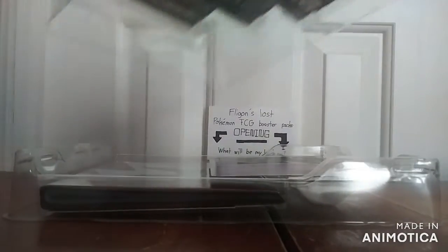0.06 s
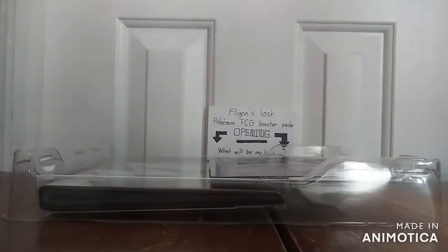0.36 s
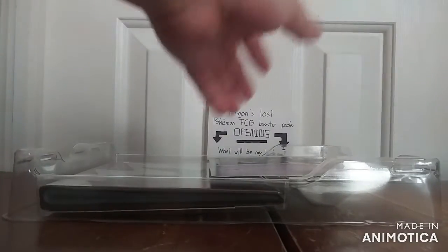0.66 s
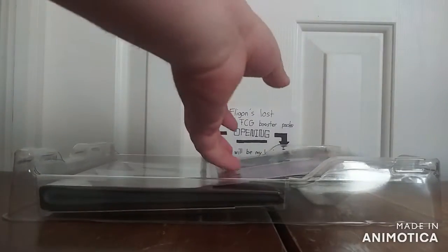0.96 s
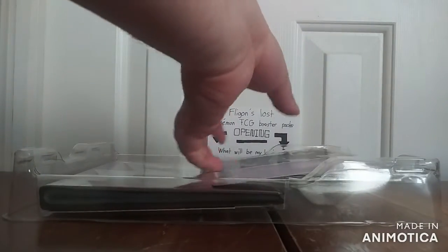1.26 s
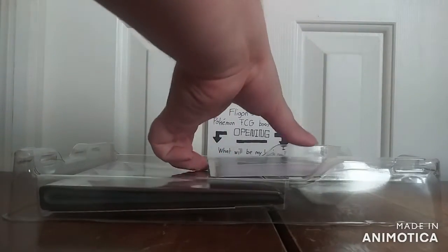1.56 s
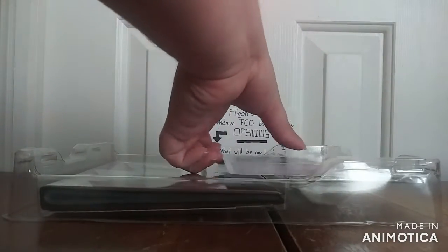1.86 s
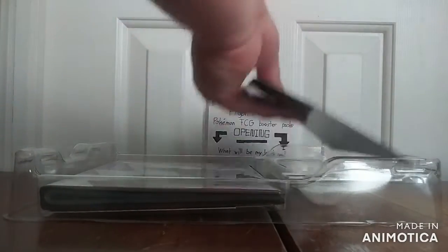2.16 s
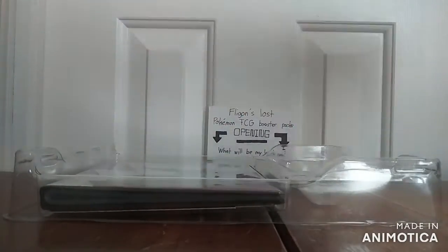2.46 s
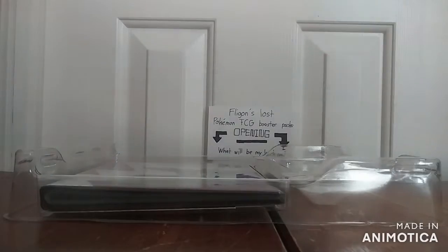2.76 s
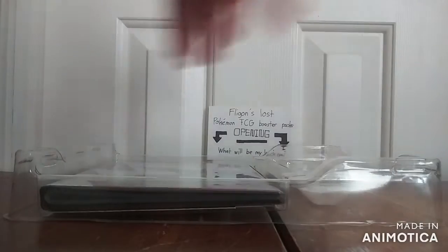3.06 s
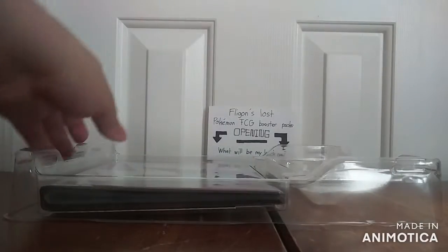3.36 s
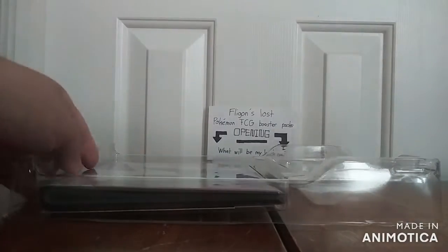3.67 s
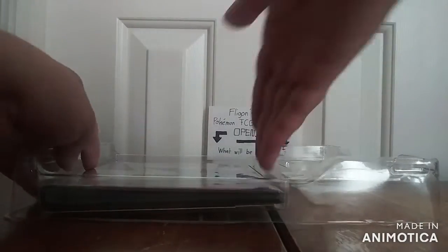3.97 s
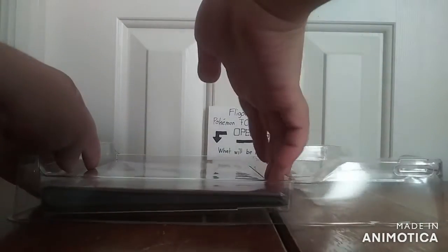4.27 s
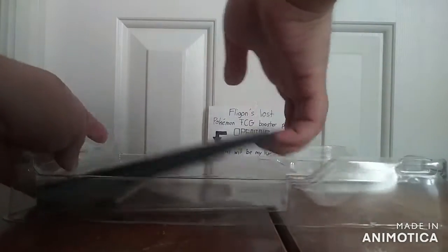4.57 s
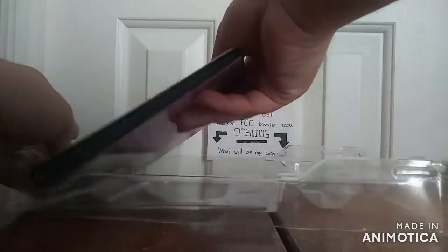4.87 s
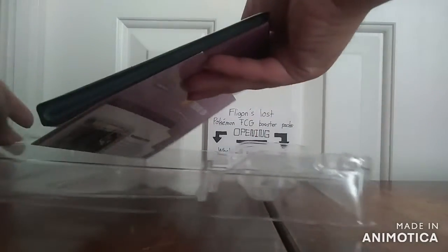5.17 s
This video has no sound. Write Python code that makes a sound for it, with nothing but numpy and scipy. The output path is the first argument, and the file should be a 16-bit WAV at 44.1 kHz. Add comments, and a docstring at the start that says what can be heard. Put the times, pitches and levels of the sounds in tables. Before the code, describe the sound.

A hard case clacks, then thin plastic packaging crackles and pops under rubbing fingers, close by in a small room.

```python
"""At a wooden table in a small room, hands work items out of a clear plastic tray near the microphone.
A hard case clacks first. The tray's thin sheet snaps and buckles, loudest as a card pops free.
Fingers and card stick and slip on the plastic, so it crinkles, ticks and rings; fingertips swish and
squeak along the rim. A few soft bumps reach the table, and near the end a card holder scrapes as it
is lifted out. Under it all lie a faint hiss and, later, a low hum."""
import sys
import numpy as np
from scipy import signal
from scipy.io import wavfile
from scipy.ndimage import uniform_filter1d

SR = 44100
rng = np.random.default_rng(int(sys.argv[2]) if len(sys.argv) > 2 else 0)


def materialize(psi):
    """Save the field psi as 16-bit PCM at rate SR to the path in sys.argv[1].

    A 1-D psi becomes a single channel; in a 2-D psi each row is a channel.
    """
    bounded = np.clip(np.atleast_2d(psi).T, -1, 1)
    quanta = np.round(bounded * 32767).astype(np.int16)
    wavfile.write(sys.argv[1], SR, quanta)


N = 238801

# A ring time (t60) is the seconds a sound takes to fade by 60 dB. Levels in the tables are relative.
# The notes of the hard case. Each row: pitch in Hz, level in dB, ring time in seconds.
CASE_NOTES = [(236, -23, 0.061), (738, -16, 0.025), (850, -23, .04), (1107, -2, 0.045), (1510, -23, 0.017),
              (2060, -22.5, .025), (3390, -19.5, 0.014), (4385, -5, 0.004), (8400, -29, 0.024)]
# The background hiss, which dips in the pause. Each row: time in seconds, level in dB.
HISS_LEVELS = [(0.9, -60.5), (2.4, -65), (2.72, -71), (3.1, -68), (3.5, -59.5), (5.4, -66)]
# Short scuffs of card and fingertips. Each row: middle in seconds, half width in seconds,
# drag level in dB, hiss level in dB, pitch of the rubbed panel in Hz.
SCUFF_EVENTS = [ (0.036, 0.01, -39, -47, 820), (0.187, 0.017, -49, -55, 860),
                (0.202, 0.0063, -40, -39, 1010), (0.558, 0.0041, -47, -50, 1100),
                (0.638, 0.0052, -48, -59, 1160), (1.26, 0.037, -44.5, -49, 800),
                (1.468, 0.019, -44, -48, 645), (1.875, 0.064, -45, -56.5, 725),
                (1.972, 0.023, -43.5, -50.5, 714), (2.125, 0.011, -41.5, -51, 1730),
                (2.363, 0.02, -41, -56.5, 617), (2.998, 0.013, -51.5, -42, 1030),
                (3.485, 0.011, -71, -43.5, 915), (3.83, 0.017, -52.5, -65, 760),
                (4.345, 0.027, -40.5, -53.5, 1063), (4.53, 0.025, -49.5, -70, 800),
                (4.678, 0.02, -51.5, -47.5, 817), (4.752, .024, -42.5, -47, 1115),
                (4.887, 0.028, -48, -44.5, 800), (4.978, 0.015, -54, -48.5, 1150),
                (5.185, 0.012, -54.5, -51.5, 1894), (5.285, 0.0099, -51, -49, 1417)]
# The notes of the tray's flat panels. Each row: pitch in Hz, level in dB, ring time in seconds.
TRAY_NOTES = [(291.6, -6, 0.086), (498, 3, 0.48), (654, 0.5, 0.32), (718, -2.5, 0.13), (785, -30.5, 0.081),
              (899, 0.5, 0.15), (1140, -0.5, 0.056), (1236, -7.5, 0.33), (1370, -5.5, 0.11),
              (1625, -5, 0.38), (1693, 2.5, .18), (1830, -16, 0.041), (2220, -29.5, 0.14), (3900, -5, .2),
              (4660, -16.5, 0.12), (6530, -21, .12), (7350, -10.5, 0.077), (7480, -15, 0.1),
              (7470, 0.5, 0.047)]
# Snaps of the sheet. Each row: start in seconds, level in dB, panel pitch in Hz, sharpness in dB,
# panel ring time in seconds.
SNAP_EVENTS = [ (0.104, -39.5, 1330, -30, 0.031), (0.222, -35, 1500, -12.5, 0.12),
               (0.239, -30, 1410, -5, 0.033), (0.283, -27.5, 1910, -14.5, 0.033),
               (0.632, -41, 1240, 0, 0.088), (0.905, -51, 1060, -3, .03),
               (0.998, -34.5, 1760, -17.5, 0.062), (1.111, -30, 700, -17.5, 0.031),
               (1.156, -29, 994, -8, 0.1), (1.171, -32.5, 668, -18, 0.092),
               (1.193, -31.5, 1020, -3.5, .085), (1.215, -28.5, 810, -2, 0.093),
               (1.311, -36.5, 1153, -15, 0.068), (1.425, -42, 1718, -5.5, 0.076),
               (1.678, -40.5, 660, -30, 0.051), (1.759, -33.5, 1170, -21, 0.058),
               (1.826, -36.5, 740, -41, 0.029), (1.917, -20, 1077, -9.5, 0.064),
               (1.927, -23.5, 980, -16, 0.13), (1.948, -23, 696, -6, 0.059), (2.229, -12, 1742, -17, 0.039),
               (2.238, -12.5, 1064, -15, 0.033), (2.25, -24, 511, -17, 0.1), (2.314, -29, 863, -21, 0.05),
               (2.326, -28.5, 887, 0.5, 0.068), (2.333, -27, 663, -4, .085),
               (2.935, -41.5, 1083, -5.5, 0.065), (2.952, -40.5, 833, -17, 0.06),
               (3.285, -31.5, 1260, 1, 0.079), (3.292, -26.5, 880, -0.5, 0.02), (3.3, -33, 800, -5, 0.035),
               (3.354, -37, 1530, -0.5, 0.044), (3.415, -46, 1490, 5, 0.029),
               (3.456, -30.5, 996, -16.5, .055), (4.193, -26.5, 1530, -12, 0.023),
               (4.201, -21.5, 860, -16, 0.02), (4.436, -38, 817, -30, 0.047),
               (4.575, -36.5, 736, 1.5, 0.024), (4.823, -30.5, 765, -8, 0.042),
               (5.055, -32.5, 748, -12, 0.036), (5.279, -42.5, 800, 3.5, 0.027)]
# Hands rubbing. Each row: start in seconds, seconds until it fades, drag level in dB, hiss level in dB.
RUB_EVENTS = [ (0.375, .34, -61.5, -52), (0.987, 0.052, -54, -56), (1.146, 0.18, -46, -49),
              (1.334, 0.24, -53, -54.5), (1.74, .47, -54.5, -60), (2.228, 0.034, -39, -41.5),
              (2.355, 0.11, -64, -60), (2.864, 0.12, -67, -60), (3.3, .06, -74, -62), (3.47, .32, -59, -70),
              (3.978, 0.16, -55, -57.5), (4.165, 0.23, -51.5, -60), (4.468, .22, -52, -56),
              (4.732, .26, -49.5, -52), (5.034, 0.3, -68, -47.5)]
# Fingertips on the rim. Each row: start in seconds, seconds until it fades, swish in dB, squeak in dB.
GLIDE_EVENTS = [(2.522, 0.057, -65, -86), (3.116, 0.044, -57, -85), (3.196, 0.041, -49.5, -72),
                (3.496, 0.15, -53, -56.5), (3.667, 0.12, -54.5, -65), (3.951, 0.2, -73, -62.5)]
# Soft bumps on the table. Each row: start in seconds, level in dB, pitch in Hz.
BUMP_EVENTS = [(2.948, -33.5, 334), (2.962, -38, 171.5), (2.982, -42, 172), (3.397, -49.5, 141),
               (3.436, -42, 114), (3.47, -39.5, 145)]
# Where scraped parts ring. Each row: pitch in Hz, base width in Hz, level in dB.
RIM_RESONANCES = [(2320, 150, -10), (4160, 380, 4), (4800, 330, 0), (5900, 370, -2)]
HOLDER_RESONANCES = [(748, 140, 0.5), (1134, 40, 1), (1407, 170, 2.5), (1900, 220, 2.5), (2170, 110, -5),
                     (2600, 200, -3)]
# Echoes off the table and the door. Each row: delay in seconds, gain (minus flips the wave).
NEAR_ECHOES = [(.0027, 0.002), (.0046, -0.0045), (.0083, 0.031), (0.0109, -0.042)]
# How long the room rings. Each row: frequency in Hz, ring time in seconds.
ROOM_RING_TIMES = [(150, 0.32), (500, 0.22), (1500, 0.21), (4000, 0.19), (7500, 0.21), (12000, 0.22)]

# The tone of each noise, from bass to treble. Each row: frequency in Hz, level in dB.
CLATTER_TONE = [(150, -24.5), (400, -15.5), (600, -11), (850, 0.5), (1200, -0.5), (1600, -3), (2100, -6.5),
                (2700, -17.5), (3600, -16), (9000, -47.5)]  # loose things in the case
CRACK_TONE = [(900, -42.5), (2200, -4.5), (3400, 5.5), (4800, 6), (5700, -1.5), (6800, 6), (7900, 6),
              (8800, -5), (10200, -6), (12000, -23.5), (15800, -25)]  # plastic cracking sharply
HISS_TONE = [(25, -39.5), (70, -14.5), (150, -12), (260, -2.5), (600, -12.5), (1200, -12), (1900, -18),
             (4000, -16.5), (6000, -19), (7800, -17), (10000, -27), (15800, -34.5)]  # moving arms, clothes and the room
DRAG_TONE = [(40, -41), (110, -16), (220, -1.5), (430, 0.5), (750, 6), (1100, 3.5), (1450, 1), (1900, -3.5),
             (2700, -5), (4500, -9.5), (9000, -51)]  # panels shaken by dragging
SKIN_TONE = [(700, -22.5), (2200, -0.5), (3300, -0.5), (4300, 2.5), (5600, 2.5), (6700, 4), (7700, 5),
             (8700, -2), (10000, -9), (12000, -14), (15800, -19)]  # skin hissing on plastic
PANEL_TONE = [(150, -45), (350, -17), (520, 1.5), (1100, 1), (1900, -2), (2700, -7), (4200, -20),
              (9000, -59)]  # a panel flipping
THUD_TONE = [(25, -50), (60, -29.5), (100, -15.5), (150, -7.5), (260, 1), (480, -4.5), (750, -21.5),
             (2000, -38.5)]  # a dull knock on tray or table
SWISH_TONE = [(1500, -14), (2800, -16), (4100, -8), (5400, -13.5), (6500, -8), (7600, -0.5), (9000, -10),
              (10500, -15.5), (13000, -17.5), (15800, -20)]  # a lightly gliding fingertip


def amp(db):
    """Turns decibels into a gain to multiply by."""
    return 10 ** (np.asarray(db) / 20)


def unit(x):
    """Scales a sound to an average (rms) level of 1."""
    return x / np.sqrt(np.mean(x ** 2) + 1e-20)


def look_up(table, hz):
    """Reads between a table's rows on a logarithmic frequency scale."""
    row_hz, value = np.transpose(table)
    return np.interp(np.log(hz + 1), np.log(row_hz + 1), value)


def add(mix, start, sound):
    """Mixes a sound in at a start time in seconds."""
    part = mix[max(round(start * SR), 0):][:len(sound)]
    part += sound[:len(part)]


def colour(x, tone, size=4096):
    """Gives a sound the tone in a table, with a filter that rings only after each hit."""
    log_gain = np.log(amp(look_up(tone, abs(np.fft.fftfreq(size, 1 / SR)))))
    response = np.exp(np.conj(signal.hilbert(log_gain)))
    taps = np.fft.ifft(response).real[:size // 2]
    return signal.oaconvolve(x, taps / np.linalg.norm(taps))[:len(x)]


def resonate(x, hz, width):
    """Keeps a band around one pitch and brings it to level 1."""
    return unit(signal.lfilter(*signal.iirpeak(hz, hz / width, fs=SR), x))


def fade(t, t60):
    """A gain that falls 60 dB in t60 seconds."""
    return np.exp(-np.log(1000) * t / np.maximum(t60, 1e-3))


def swell(start, rise_s):
    """A gain that climbs from 0 to 1 and stays there."""
    return np.clip((np.arange(N) / SR - start) / rise_s, 0, 1)


def stroke(start, length, rise_s, t60):
    """The gain of one hand movement: it climbs, holds, then fades."""
    since_end = np.maximum(np.arange(N) / SR - start - length, 0)
    return swell(start, rise_s) * fade(since_end, t60)


def burst(t, t60, tone, grit):
    """A fading cluster of tiny kicks; more grit makes their sizes more uneven."""
    kicks = rng.standard_normal(len(t)) * np.exp(grit * rng.standard_normal(len(t)))
    sound = colour(kicks * fade(t, t60), tone)
    return sound / np.linalg.norm(sound) * np.sqrt(SR / 200)  # the energy of 5 ms at level 1


def slips(per_s, spread_db, smooth):
    """Surfaces stick and slip: tiny random kicks over smooth sliding noise."""
    sizes = amp(spread_db * np.minimum(rng.exponential(1, N), 4))
    kicks = sizes * rng.choice([-1, 1], N) * (rng.random(N) < per_s / SR)
    return unit(unit(kicks) + smooth * rng.standard_normal(N))


def catching(depth_db, catch_s):
    """A gain that wanders as a grip catches and lets go."""
    wander = unit(uniform_filter1d(rng.standard_normal(N), int(catch_s * SR)))
    return unit(amp(depth_db * wander))


def scrape(resonances, per_s, smooth, widen=1.1):
    """An edge or fingertip judders over plastic and sets it ringing."""
    judder = slips(per_s, spread_db=3, smooth=smooth)
    ring = np.zeros(N)
    for hz, width, db in resonances:
        band = resonate(judder, hz, width * widen)
        ring += amp(db) * resonate(band, hz, width * widen)  # a second pass gives steeper sides
    return unit(ring)


def case_clack(start=0.0002, low_cut_hz=190):
    """A stiff case is knocked close by: it rings briefly and its loose contents clatter."""
    t = np.arange(SR // 5) / SR
    ring = sum(amp(db) * fade(t, t60) * np.sin(2 * np.pi * hz * t) for hz, db, t60 in CASE_NOTES)
    clatter = amp(-20) * burst(t, t60=0.067, tone=CLATTER_TONE, grit=0.36)
    rattle = amp(-25) * burst(t, t60=0.044, tone=CRACK_TONE, grit=1)
    out = np.zeros(N)
    add(out, start, amp(-12) * ring + clatter + rattle)
    return signal.sosfilt(signal.butter(4, low_cut_hz, "high", fs=SR, output="sos"), out)


def hiss():
    """A soft background hiss of moving arms, clothes and room, dipping in the pause."""
    level_db = np.interp(np.arange(N) / SR, *np.transpose(HISS_LEVELS))
    return amp(level_db) * colour(rng.standard_normal(N), HISS_TONE)


def scuffs():
    """Short strokes swell and fade, each drawing a hollow note from the panel under it."""
    t, out = np.arange(N) / SR, np.zeros(N)
    crinkle = slips(per_s=1200, spread_db=1, smooth=0.46)
    drag = colour(crinkle, DRAG_TONE)
    fizz = colour(slips(per_s=2700, spread_db=5, smooth=0.67), SKIN_TONE)
    for middle, half_width, drag_db, hiss_db, hz in SCUFF_EVENTS:
        near = abs(t - middle) < 3 * half_width
        hollow = resonate(crinkle[near], hz, width=hz / 9)
        body = amp(-5) * unit(drag[near]) + amp(-4) * hollow
        touch = np.exp(-((t[near] - middle) / half_width) ** 2)
        out[near] += touch * (amp(drag_db) * body + amp(hiss_db - 1) * fizz[near])
    return out


def tray(x):
    """Whatever touches the tray sets its panels ringing."""
    t = np.arange(SR // 2) / SR
    ring = np.zeros(len(t))
    for hz, db, t60 in TRAY_NOTES:
        fall = fade(t, t60)
        ring += amp(db) * 2 * fall / fall.sum() * np.cos(2 * np.pi * hz * t)
    return x + amp(-1) * signal.oaconvolve(x, ring)[:N]


def snap(db, hz, sharp_db, t60, usual_t60=0.056, thud_limit_db=-36.5, rise_s=0.00043):
    """A panel flips and rings, shoves the whole tray, and cracks along its stiff crease."""
    t = np.arange(SR // 5) / SR
    panel = amp(-9) * burst(t, t60, PANEL_TONE, grit=0.5)
    # Duller snaps have a purer note.
    note = amp(-11 - 0.26 * sharp_db) * np.sin(2 * np.pi * hz * t) * fade(t, t60 * 0.95)
    # A larger panel rings longer and shoves harder, until the table limits the thud.
    thud_db = min(-15 + 7.5 * np.log2(t60 / usual_t60), thud_limit_db - db)
    thud = amp(thud_db) * burst(t, t60 * 1.74, THUD_TONE, grit=0.49)
    crack = amp(sharp_db - 1) * burst(t, t60, CRACK_TONE, grit=0.47)
    # The sharper the snap, the higher its crease rings.
    crease_hz = np.interp(sharp_db, [-20.5, -3.5], [2190, 7280])
    crease_tone = [(crease_hz / 2, -45), (crease_hz * 0.9, -3), (crease_hz * 1.07, 0),
                   (crease_hz * 1.5, -35), (SR, -70)]
    crease = amp(sharp_db - 7) * burst(t, t60=0.038, tone=crease_tone, grit=0.148)
    return amp(db) * (panel + note + thud + crack + crease) * (1 - np.exp(-t / rise_s))


def snaps(creak_s=0.009):
    """The sheet creaks as it strains, snaps, and creaks as it settles."""
    t = np.arange(N) / SR
    out, strain = np.zeros((2, N))
    for start, db, hz, sharp_db, t60 in SNAP_EVENTS:
        add(out, start, snap(db, hz, sharp_db, t60))
        creak_db = min(db, -28.5) - 27  # grows with the snap, up to a limit
        strain += amp(creak_db) * np.exp(-abs(t - start) / creak_s)
    creak = colour(slips(per_s=1300, spread_db=4, smooth=0.99), DRAG_TONE)
    return out + strain * creak


def rubbing():
    """Dragging fingers and card shake the panels and hiss on the smooth plastic."""
    drag_gain, hiss_gain = np.zeros((2, N))
    for start, length, drag_db, hiss_db in RUB_EVENTS:
        contact = stroke(start, length, rise_s=0.0086, t60=0.57)  # lands quickly, eases off
        drag_gain = np.maximum(drag_gain, contact * amp(drag_db - 1))
        hiss_gain = np.maximum(hiss_gain, contact * amp(hiss_db - 3))
    grip = catching(depth_db=3.5, catch_s=0.025)
    crinkle = slips(per_s=700, spread_db=1, smooth=0.76)
    fizz = unit(slips(per_s=3800, spread_db=0, smooth=0.78) + 0.35 * crinkle)
    return grip * (drag_gain * colour(crinkle, DRAG_TONE) + hiss_gain * colour(fizz, SKIN_TONE))


def ticks(per_s=8.8, spread_db=2, low_hz=650, high_hz=1754):
    """Tiny patches of sheet flip at random under the rubbing hand, louder as it presses harder."""
    out = np.zeros(N)
    for start, length, drag_db, _ in RUB_EVENTS:
        for when, size, pitch in rng.random((round(per_s * length), 3)):
            db = drag_db + 9 + spread_db * (2 * size - 1)
            hz = low_hz + pitch * (high_hz - low_hz)
            add(out, start + when * length, snap(db, hz, sharp_db=-12.5, t60=0.031))
    return out


def glides():
    """Fingertips glide with a fine, bright swish, and their judder makes the rim squeak."""
    swish = colour(slips(per_s=11000, spread_db=3.5, smooth=1), SWISH_TONE)
    squeak = scrape(RIM_RESONANCES, per_s=3000, smooth=0.85)
    out = np.zeros(N)
    for start, length, swish_db, squeak_db in GLIDE_EVENTS:
        contact = stroke(start, length, rise_s=0.015, t60=0.083)
        out += contact * (amp(swish_db) * swish + amp(squeak_db) * squeak)
    return out


def bumps(t60=0.05, rise_s=0.00036):
    """Soft blows on the table: a low note that dies quickly, and a dull knock."""
    t, out = np.arange(SR // 5) / SR, np.zeros(N)
    for start, db, hz in BUMP_EVENTS:
        note = np.sin(2 * np.pi * hz * t) * fade(t, t60) * (1 - np.exp(-t / rise_s))
        knock = amp(-7) * burst(t, t60, THUD_TONE, grit=0.12)
        add(out, start, amp(db) * (note + knock))
    return out


def hum(hz=97, db=-70.5):
    """A faint low hum swells late in the scene."""
    wave = np.sqrt(2) * np.sin(2 * np.pi * hz * np.arange(N) / SR)
    return amp(db) * swell(start=3.35, rise_s=1.96) * wave


def holder_lift(db=-50.5):
    """The card holder drags its edge over the tray on the way out, catching as it goes."""
    contact = swell(start=4.61, rise_s=0.12) * catching(depth_db=4, catch_s=0.03)
    return amp(db) * contact * scrape(HOLDER_RESONANCES, per_s=770, smooth=0.35)


def room(x, walls_db, build_s=0.0098):
    """A few near echoes, then a wash of wall reflections in which the bass lasts longest."""
    hz, t, bands = signal.stft(rng.standard_normal(SR // 2), SR, nperseg=256)
    bands = bands * fade(t, look_up(ROOM_RING_TIMES, hz)[:, None]) * (1 - np.exp(-t / build_s))
    tail = signal.istft(bands, SR, nperseg=256)[1]
    out = x + amp(walls_db) * signal.oaconvolve(x, tail / np.linalg.norm(tail))[:N]
    for delay, gain in NEAR_ECHOES:
        add(out, delay, gain * x)
    return out


def suppress_noise(x, threshold_db=-87, depth_db=-9):
    """Turns down each frequency band while it is very quiet."""
    bands = signal.stft(x, nperseg=512, noverlap=384)[2]
    power = uniform_filter1d(abs(bands) ** 2, size=5, axis=-1)  # smooth over time
    power = abs(uniform_filter1d(power, size=7, axis=-2))  # and over frequency
    least = amp(depth_db)
    gain = least + (1 - least) * power / (power + amp(threshold_db) ** 2)
    return signal.istft(bands * gain, nperseg=512, noverlap=384)[1][:, :N]


def scene():
    """The handling and the closer, drier clack sound in the room, over hiss and hum."""
    ringing_tray = tray(snaps() + rubbing() + scuffs() + ticks())
    handling = room(ringing_tray + holder_lift() + glides() + bumps(), walls_db=-9)
    clack = room(case_clack(), walls_db=-17)
    return (handling + clack + hiss() + hum())[None]


def record(dry, low_cut_hz=60, high_cut_hz=15900):
    """The small microphone loses deep bass; then faint noise is turned down and the top treble cut."""
    thin = signal.sosfilt(signal.butter(2, low_cut_hz, "high", fs=SR, output="sos"), dry)
    treble_cut = signal.firwin(511, high_cut_hz, window=("kaiser", 9), fs=SR)
    return signal.oaconvolve(suppress_noise(thin), treble_cut[None], "same")


dry = scene()
out = record(dry)
materialize(out)
```